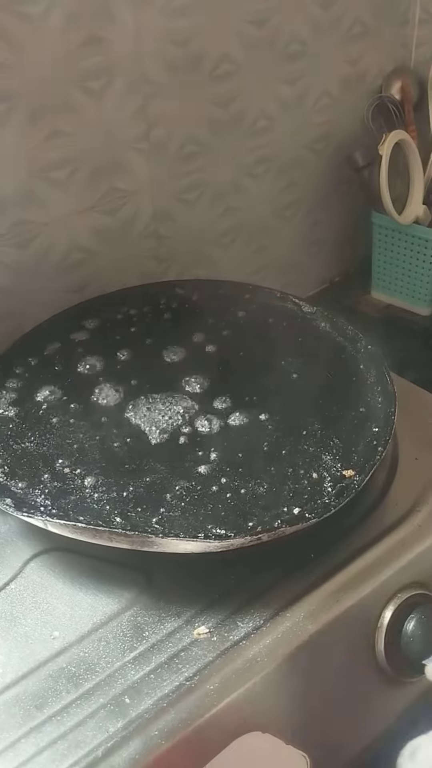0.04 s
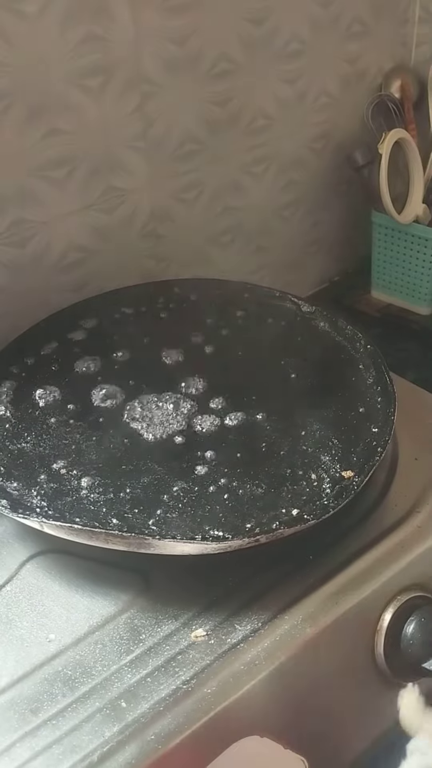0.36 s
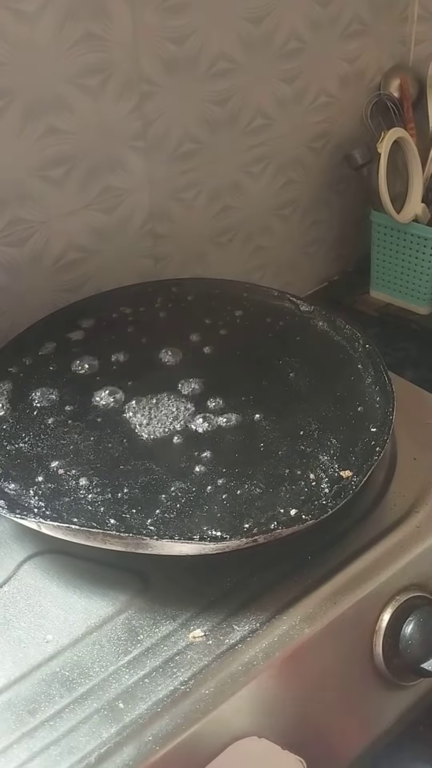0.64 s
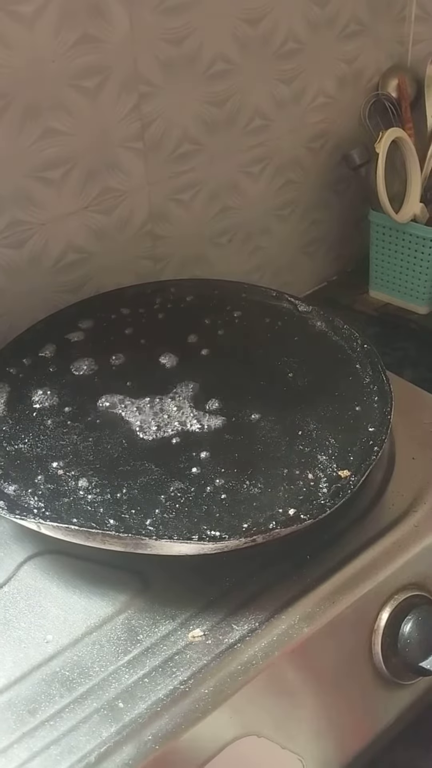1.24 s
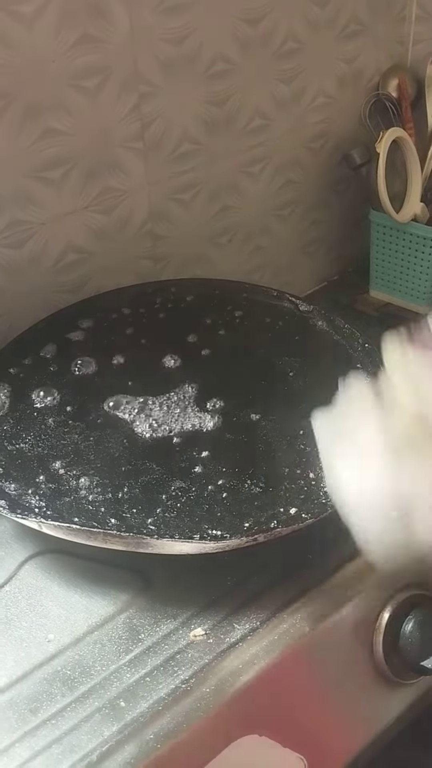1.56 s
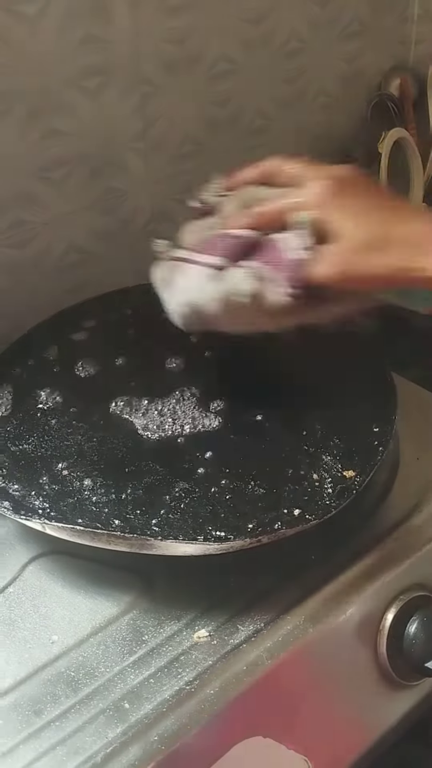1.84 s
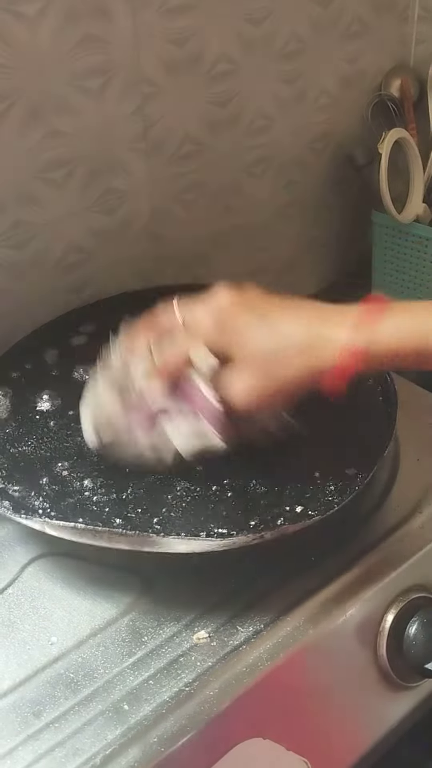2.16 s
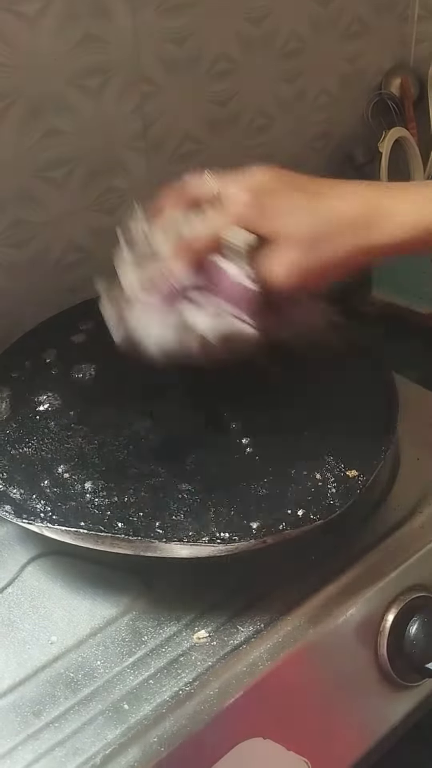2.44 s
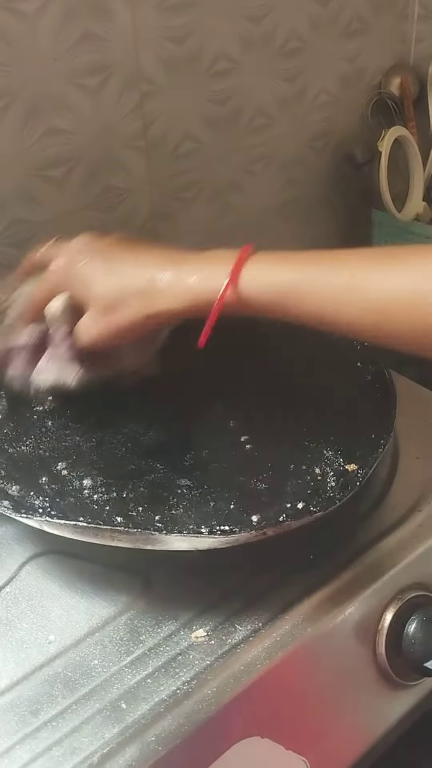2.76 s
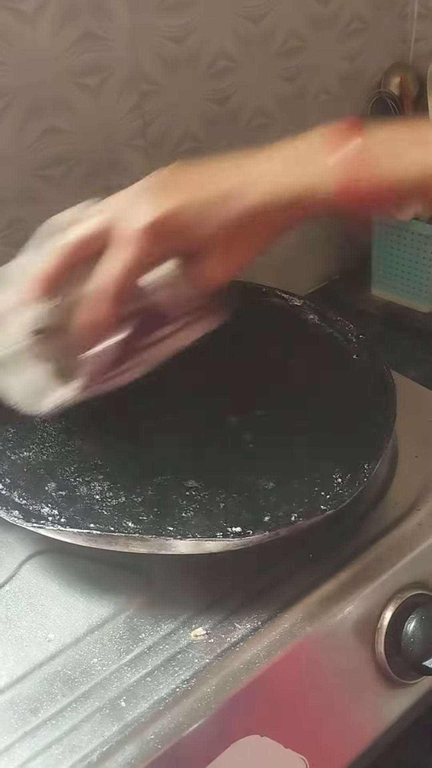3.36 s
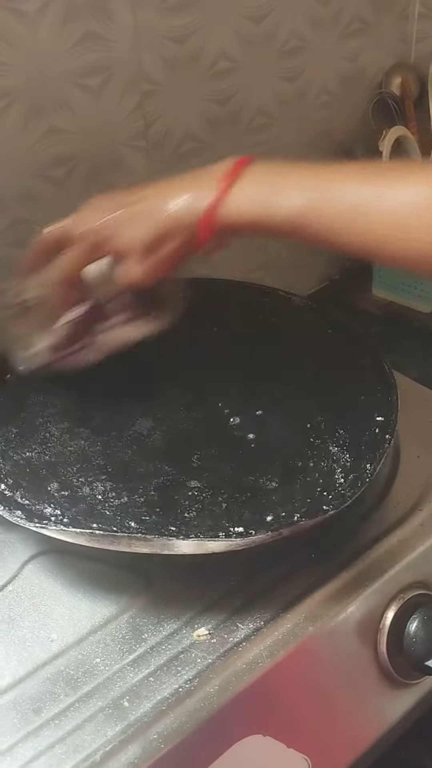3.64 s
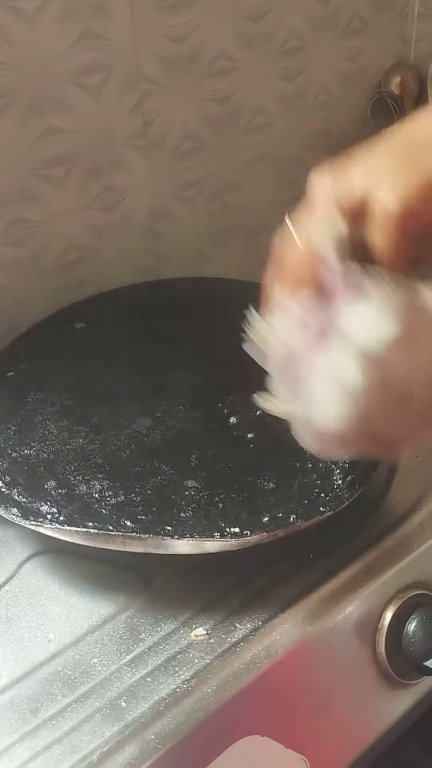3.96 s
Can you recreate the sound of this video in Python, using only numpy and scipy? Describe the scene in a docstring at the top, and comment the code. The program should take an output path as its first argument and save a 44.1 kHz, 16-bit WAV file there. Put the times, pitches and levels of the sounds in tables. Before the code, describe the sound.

Water sizzles on a hot griddle, fading as a cloth wipes it with wet slaps.

```python
"""Water sizzles and spits on a hot griddle, heard on two microphones in a small hard-walled kitchen.
Steam hisses, bubbles and drops burst; the sizzle thins as a cloth wipes the water away.
Early on, flecks of spatter land on the left microphone and pop. From two seconds in, three pairs
of soft, wet slaps ring through the room, and steam squirts from under a few drops.
A low room rumble lies under it all."""
import sys
import numpy as np
from scipy import signal
from scipy.fft import rfft, irfft
from scipy.io import wavfile
from scipy.ndimage import uniform_filter1d

SR = 44100
rng = np.random.default_rng(int(sys.argv[2]) if len(sys.argv) > 2 else 0)


def inscribe(sig):
    """Save sig as 16-bit PCM at rate SR to the path in sys.argv[1].

    A 1-D sig is mono; a 2-D sig holds one channel per row.
    Samples are clipped to [-1, 1] before scaling.
    """
    pcm = np.round(np.clip(np.atleast_2d(sig).T, -1, 1) * 32767)
    wavfile.write(sys.argv[1], SR, pcm.astype(np.int16))


N = 176400

# spectrum of water boiling on the griddle: frequency_hz, gain_db
SIZZLE_SPECTRUM = [(60, -42), (400, -8), (1000, -2.5), (2000, 0.5), (2900, 0.5), (4300, 4.5), (8000, 3.5),
                   (16000, 3)]
# likeness of the two microphones in diffuse sound: frequency_hz, correlation
MIC_COHERENCE = [(40, 0.44), (130, 0.87), (300, 0.88), (550, 0.21), (1200, 0), (16000, 0.5)]
SIZZLE_TREBLE_HZ = 7000


def amp(db):
    return 10 ** (np.asarray(db) / 20)


def unit_rms(x):
    return x / np.sqrt(np.mean(x ** 2) + 1e-20)


def curve_at(points, hz):
    """Interpolates a table on a log-frequency axis."""
    f, value = np.transpose(points)
    return np.interp(np.log(hz + 1), np.log(f + 1), value)


def add(mix, start_s, sound):
    part = mix[:, round(start_s * SR):][:, :sound.shape[-1]]
    part += sound[..., :part.shape[1]]


def convolve(x, response):
    return signal.fftconvolve(np.atleast_2d(x), np.atleast_2d(response), axes=1)[:, :x.shape[-1]]


def colour(x, spectrum, size=4096):
    """Minimum-phase filter with the given spectrum."""
    log_gain = np.log(amp(curve_at(spectrum, abs(np.fft.fftfreq(size, 1 / SR)))))
    response = np.fft.ifft(np.exp(np.conj(signal.hilbert(log_gain)))).real
    return convolve(x, response[:size // 2])


def highpass(x, hz):
    return signal.lfilter(*signal.butter(1, hz, "high", fs=SR), x)


def resonance(x, hz, q):
    return signal.lfilter(*signal.iirpeak(hz, q, fs=SR), x)


def diffuse_noise(size):
    """White noise arriving from all sides, most alike at the two microphones in the bass."""
    a, b = rfft(rng.standard_normal((2, size)))
    alike = curve_at(MIC_COHERENCE, np.fft.rfftfreq(size, 1 / SR))
    mid, side = a * np.sqrt((1 + alike) / 2), b * np.sqrt((1 - alike) / 2)
    return irfft(np.array([mid + side, mid - side]), size)


def kitchen_echoes(build_s=.012, build_hz=1490):
    """Hard walls answer with unit energy: the bass builds up slowly and lasts longest."""
    # reverberation of the kitchen: frequency_hz, t60_s
    reverb_times = [(100, 0.44), (400, 0.47), (1000, 0.4), (2800, 0.37), (6000, 0.24), (15000, 0.19)]
    hz, t, noise = signal.stft(diffuse_noise(SR), SR, nperseg=512)
    hz = hz[:, None]
    build = 1 - np.exp(-(t + 0.0005) * (1 + hz / build_hz) / build_s)
    decay = amp(-60 * t / curve_at(reverb_times, hz))
    tail = signal.istft(noise * build * decay, SR, nperseg=512)[1]
    return tail / np.linalg.norm(tail[0])


def from_griddle(x, room_db, lag_samples=2):
    """Direct sound reaches the nearer, left microphone first; the room answers."""
    at = np.arange(len(x))
    direct = np.array([x, np.interp(at - lag_samples, at, x)])
    return direct + amp(room_db) * convolve(x, kitchen_echoes())


def bubbles(per_s, spread_db):
    """A random train of bursting bubbles, mostly tiny."""
    size = amp(spread_db * np.minimum(rng.exponential(1, N), 3.6))
    return unit_rms(size * rng.choice([-1, 1], N) * (rng.random(N) < per_s / SR))


def sizzle(flutter_db=0.76, flutter_s=0.015, tick_follow=0.36):
    """Steam hiss, dense fizz and sparse ticks all follow the boil."""
    # how hard the water boils: time_s, level_db, cut_below_treble_db
    boil_curve = [(0, -29.5, -3), (.07, -32.5, -2.5), (.1, -29.5, -1.5), (.5, -27.3, 2.5), (.8, -29.5, .5),
                  (.87, -34, -1), (.93, -29, 1), (1.4, -31.5, 0), (1.8, -33, 0), (2.25, -33, 2),
                  (2.38, -38, -.5), (2.68, -34, 4.5), (2.78, -40, 0.5), (2.92, -37, -1.5), (3.25, -40.5, 4),
                  (3.5, -41, 5.5), (3.87, -36, 5.5), (4, -43.5, 4)]
    times, levels, cuts = np.transpose(boil_curve)
    t = np.arange(N) / SR
    level_db, cut_db = np.interp(t, times, levels), np.interp(t, times, cuts)
    flutter = unit_rms(uniform_filter1d(rng.standard_normal(N), int(flutter_s * SR)))
    boil = amp(level_db + flutter_db * flutter)
    fizz = amp(-3.5) * boil * bubbles(per_s=2600, spread_db=6)
    tick_db = -37.5 + tick_follow * (level_db - level_db.max())
    ticks = amp(tick_db) * bubbles(per_s=130, spread_db=7)
    bursts = from_griddle(fizz + ticks, room_db=-2)
    hiss = amp(-1) * boil * diffuse_noise(N)
    sound = bursts + hiss
    treble = highpass(sound, SIZZLE_TREBLE_HZ)
    return colour(treble + (sound - treble) * amp(-cut_db), SIZZLE_SPECTRUM)


def room_tone():
    """A steady low rumble reaches the microphones from all sides."""
    # background of the kitchen: frequency_hz, gain_db
    rumble_spectrum = [(20, 6.5), (55, -7.5), (82, 2.5), (100, -2), (125, 0.5), (158, -11), (200, 4.5),
                       (250, -6.5), (320, -4), (450, -5.5), (800, -11), (2000, -19), (16000, -63)]
    return amp(-41.5) * unit_rms(colour(diffuse_noise(N), rumble_spectrum))


def spits(trail_per_s=9000):
    """A drop bursts on the griddle with a snap and a short trail of smaller ones."""
    # bursting drops: start_s, level_db, trail_decay_s, treble_db
    drops = [(.079, -3, 0.024, 9.5), (.7525, -13, .003, 11), (.7742, -4, .001, -1), (0.7965, 7, 0.0027, -1),
             (.806, -4.5, 0.00074, -2), (1.2035, -9, .001, 0), (1.2905, 7, 0.0033, -9),
             (1.3057, 0, 0.0009, -12), (1.470, 3, 0.0053, -12), (1.715, 0.5, .005, -15),
             (1.870, 0.5, .003, -10), (1.907, -2, 0.0022, -0.5), (2.024, -13, .002, 12),
             (2.4455, -11.5, .003, 7.5), (2.567, -18, .002, -18.5), (2.5965, -6, 0.0013, -3),
             (2.854, 1, 0.021, 3.5), (3.0147, -0.5, 0.0074, -1.5), (3.240, -6, 0.0055, -1),
             (3.294, -17, .001, 0), (3.416, -11.5, 0.0055, 1), (3.6665, -14.5, .001, 7)]
    out, t = np.zeros((1, N)), np.arange(SR // 10) / SR
    for start_s, level_db, decay_s, treble_db in drops:
        trail = rng.standard_normal(len(t)) * (rng.random(len(t)) < trail_per_s / SR)
        snap = (t == 0) + amp(-5) * trail * np.exp(-t / decay_s)
        snap /= np.linalg.norm(snap)
        snap += (amp(treble_db) - 1) * highpass(snap, SIZZLE_TREBLE_HZ)
        add(out, start_s, amp(level_db) * snap)
    return colour(from_griddle(out[0], room_db=-3.5), SIZZLE_SPECTRUM)


def spatter_pops(tick_s=0.00022, rise_s=0.00013, leak_hz=5.2):
    """A fleck hits the left microphone's port: a tick, then a pressure step that leaks away."""
    # spatter on the microphone: start_s, level_db
    flecks = [(0.2416, -10), (0.3063, -20.5), (0.3422, -22), (0.7586, -19), (0.9659, -17.5), (1.0225, -21),
              (1.1740, -9), (1.5462, -16), (1.75, -23.5)]
    out, t = np.zeros((2, N)), np.arange(SR // 3) / SR
    tick = 1.86 * np.exp(-t / tick_s)
    step = 1 - np.exp(-t / rise_s)
    pop = highpass(highpass(tick - step, leak_hz), leak_hz)
    for start_s, level_db in flecks:
        add(out, start_s, amp(level_db) * np.outer([1, 0], pop))
    return out


def room_ring(t, rise_s=0.004):
    """A slap sets the kitchen's low resonances ringing, at a different phase at each microphone."""
    # standing waves between the walls: pitch_hz, level_db, t60_s
    modes = [(178.5, -22, .56), (228.2, -2, 0.38), (331, 1, 0.59), (427.6, -11.5, 0.64), (552, -0.5, 0.59),
             (627, -13.5, 0.25), (714, -5.5, 0.51), (784, 3, 0.34), (852, -24, 0.45), (954, -15, 0.48),
             (1074, -10.5, 0.43), (1148, -6, 0.36), (1252, -6.5, 0.43)]
    out = np.zeros((2, len(t)))
    for hz, level_db, t60_s in modes:
        mic_phase = np.arccos(curve_at(MIC_COHERENCE, hz)) * np.array([[0], [1]])
        tone = np.sin(2 * np.pi * (hz * t + rng.random()) + mic_phase)
        out += tone * amp(level_db - 60 * t / t60_s)
    return out * (1 - np.exp(-t / rise_s))


def slaps(shared_echo=0.41, crack_rise_s=0.0016, crack_decay_s=0.0028, thump_hz=81, thump_s=.06):
    """A ringing crack, a hollow blow and a low thump, heard off-mic, mostly through the room."""
    # wet slaps: start_s, level_db, crack_db, treble_db, hollow_pitch_hz
    hits = [(2.0724, 30, 2.5, 1, 260), (2.2090, 30, 0.5, -1, 563), (2.6356, 28.5, 2.5, 0, 256),
            (2.855, 28, -2, -4.5, 347), (3.7173, 24.5, 0.5, 3, 227), (3.9445, 25, 1, -1, 756)]
    # spectrum of a slap: frequency_hz, gain_db
    slap_spectrum = [(40, -42), (80, -14.5), (125, -7), (170, -14.5), (280, -1), (500, 0), (760, -3),
                     (980, -7), (1600, -9.5), (2300, -11.5), (3000, -15.5), (4900, -14.5), (6500, -19.5),
                     (9000, -26), (16000, -40)]
    # resonances of the crack: pitch_hz, level_db
    crack_rings = [(2300, -3), (3290, -3), (3710, -1), (4850, -6)]
    out, t = np.zeros((2, N)), np.arange(SR) / SR
    room = kitchen_echoes()
    direct = amp(-16.5) * (t == 0)
    crack_envelope = (1 - np.exp(-t / crack_rise_s)) * np.exp(-t / crack_decay_s)
    thump = amp(-65.5) * np.sin(2 * np.pi * thump_hz * t) * np.exp(-t / thump_s)
    for start_s, level_db, crack_db, treble_db, hollow_hz in hits:
        crack = highpass(diffuse_noise(SR), hz=2130) * crack_envelope
        crack *= amp(crack_db - 2.5) / np.linalg.norm(crack[0])
        # part of the echo is common to all slaps, the rest is each one's own
        echoes = np.sqrt(shared_echo) * room + np.sqrt(1 - shared_echo) * kitchen_echoes()
        blow = direct + crack + echoes[:, :SR]
        ringing = sum(amp(db) * resonance(blow, hz, q=48) for hz, db in crack_rings)
        sound = colour(blow + ringing, slap_spectrum) + amp(-52) * room_ring(t)
        sound += amp(-7) * resonance(sound, hollow_hz, q=4) + thump
        sound += (amp(treble_db) - 1) * highpass(sound, hz=1200)
        add(out, start_s, amp(level_db) * sound)
    return out


def steam_squirts(width_s=0.0074):
    """Steam escapes from under a drop in a short, narrow hiss."""
    # jets of steam: peak_s, level_db, pitch_hz
    jets = [(2.545, -41, 4560), (2.568, -31.5, 4400), (3.135, -35, 5800), (3.272, -35.5, 5400),
            (3.418, -38.5, 4650), (3.460, -42, 4400)]
    out, t = np.zeros(N), np.arange(N) / SR
    for peak_s, level_db, pitch_hz in jets:
        swell = np.exp(-.5 * ((t - peak_s) / width_s) ** 2)
        hiss = unit_rms(resonance(rng.standard_normal(N), pitch_hz, q=8.6))
        out += amp(level_db) * swell * hiss
    return from_griddle(out, room_db=-3.5)


def scene():
    """The kitchen as it reaches the microphone pair."""
    return sizzle() + spits() + steam_squirts() + slaps() + spatter_pops() + room_tone()


def record(dry, top_hz=15950):
    """Each microphone has its own treble notches; both cut off steeply at the top."""
    # response of the microphones: frequency_hz, left_db, right_db
    mic_response = [(100, 1, 1.5), (1620, -1.5, -1), (4740, 3.5, 2.5), (6710, 0.5, -3.5), (7460, -2.5, -30),
                    (8030, -10, -19), (9330, -1.5, -17.5), (10600, -2, -23.5), (10960, -5, -16),
                    (12280, 5.5, -14), (13570, 8.5, -8), (15900, 6, -6)]
    mics = np.array(mic_response)
    heard = np.vstack([colour(dry[0], mics[:, [0, 1]]), colour(dry[1], mics[:, [0, 2]])])
    band_limit = signal.firwin(1023, top_hz, window=("kaiser", 9), fs=SR)
    return signal.oaconvolve(heard, band_limit[None], "same")


dry = scene()
out = record(dry)
inscribe(out)
```